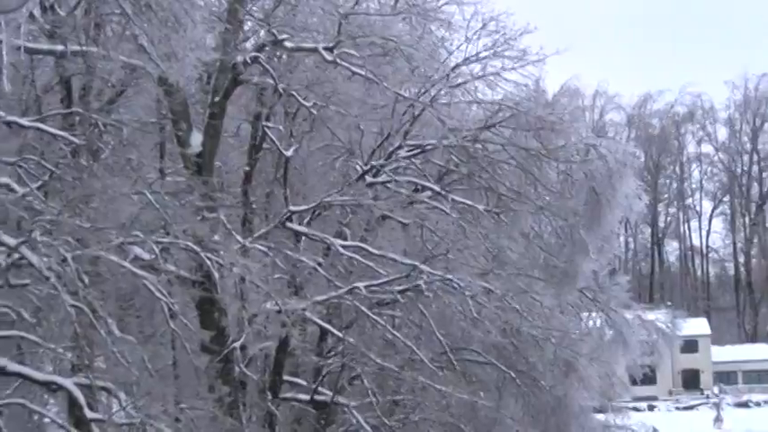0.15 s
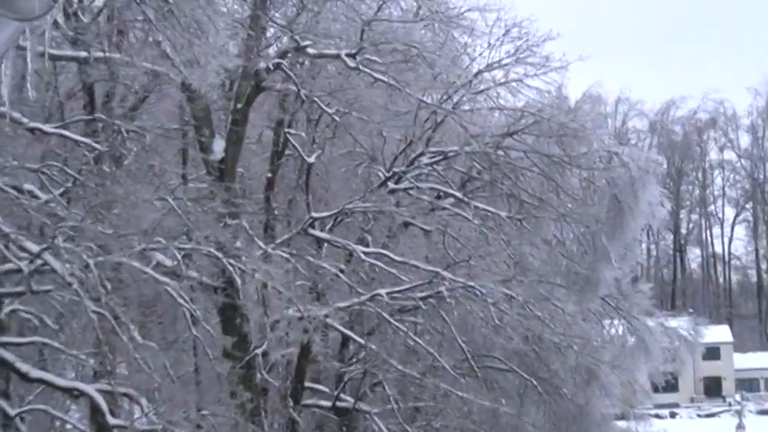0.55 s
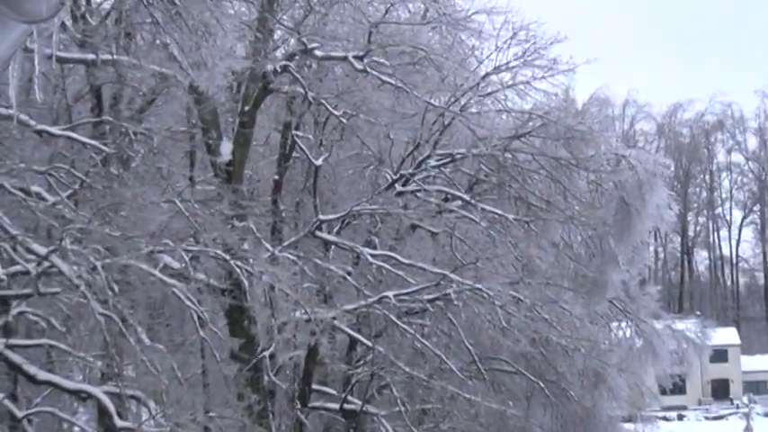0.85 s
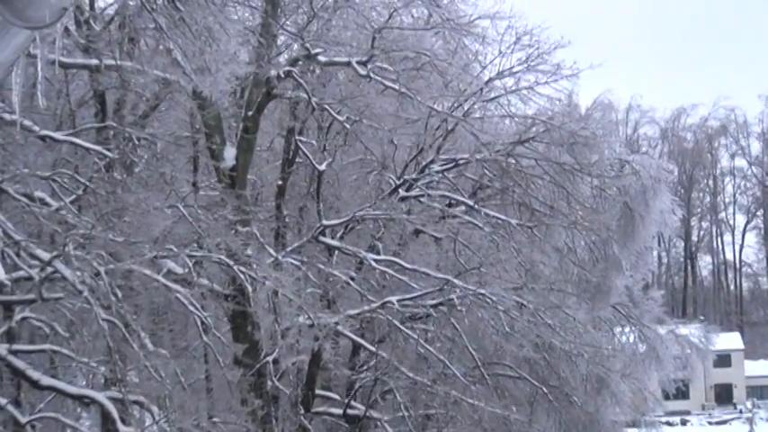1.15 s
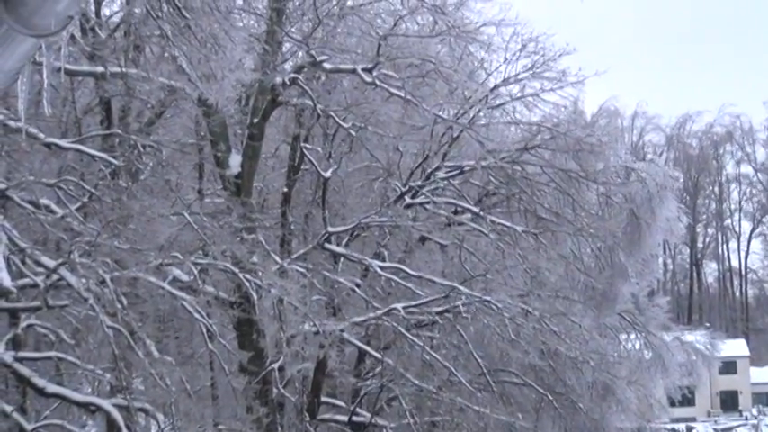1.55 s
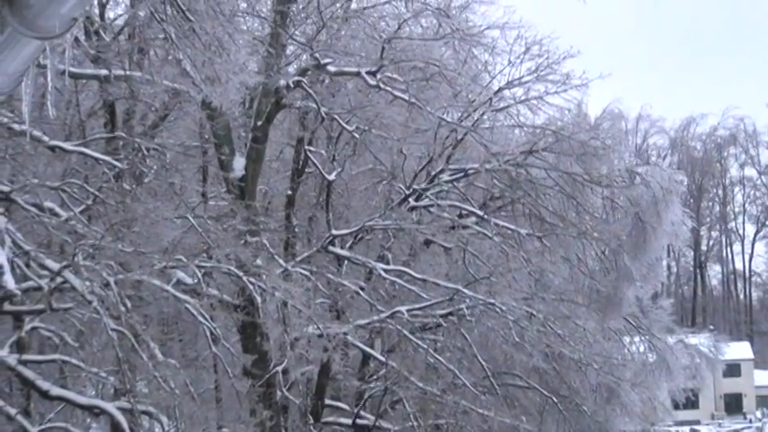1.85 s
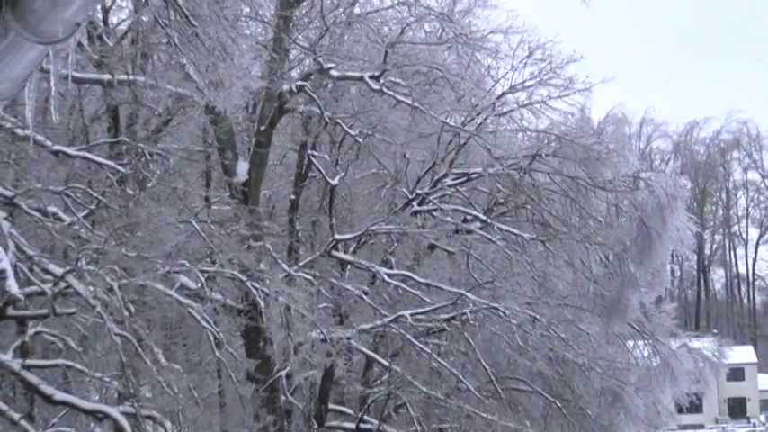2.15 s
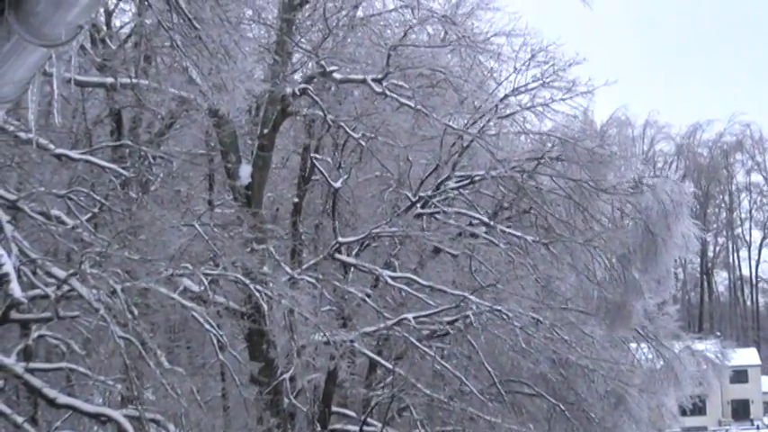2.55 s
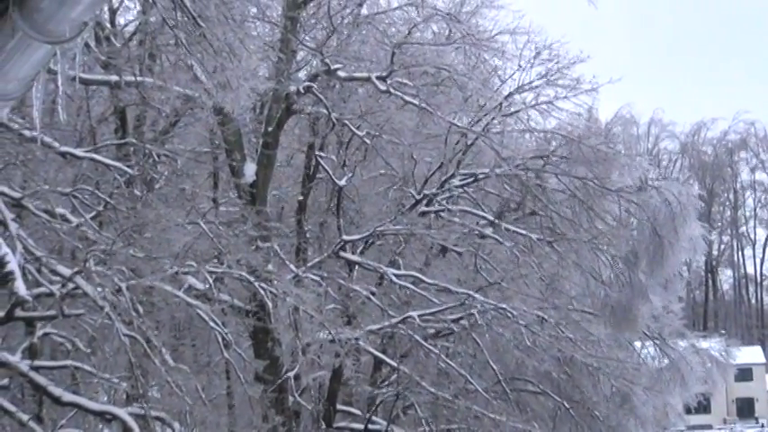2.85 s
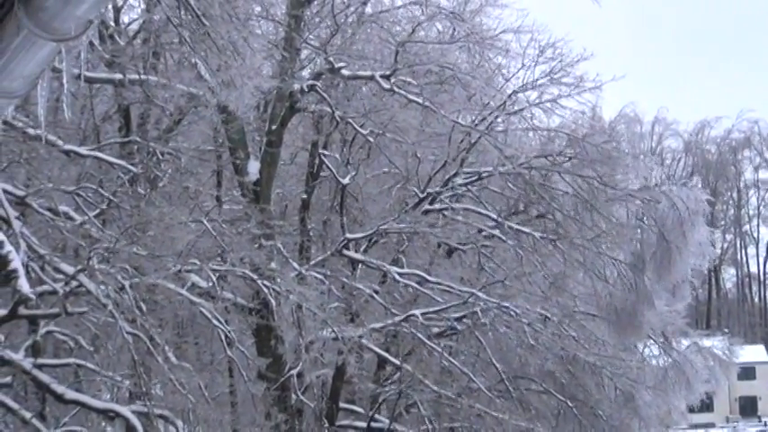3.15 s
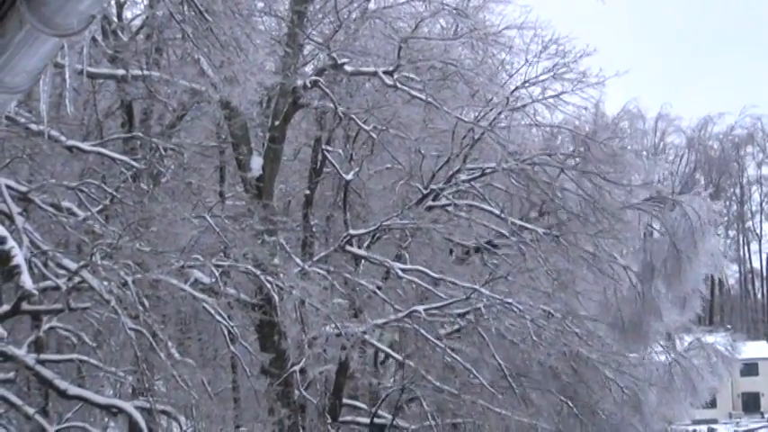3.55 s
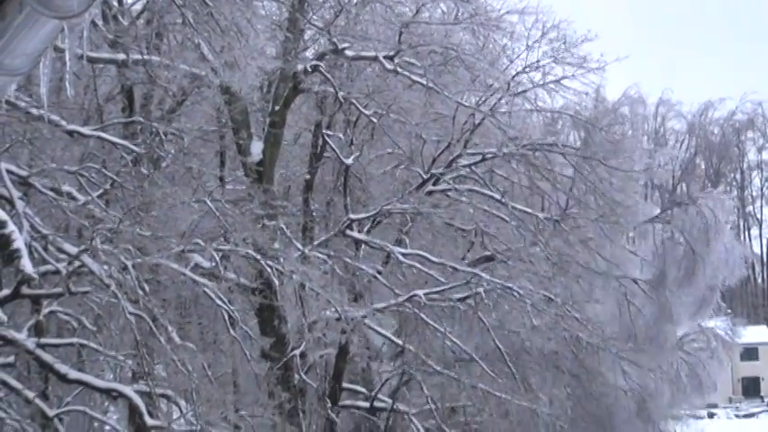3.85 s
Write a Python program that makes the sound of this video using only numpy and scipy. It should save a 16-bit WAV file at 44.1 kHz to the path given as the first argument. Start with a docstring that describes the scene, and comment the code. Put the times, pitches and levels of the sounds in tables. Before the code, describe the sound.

Wood cracks sparsely at a distance in a frozen forest, then faster, swelling into a loud crackling rush as a limb gives way. Close by, ice bits tick and sift down over steady, distant air noise.

```python
"""A limb of an ice-laden tree, some way off, splinters in ever denser cracks until it tears loose in a rush.
Each fracture excites a cluster of damped vibrations, and the woods answer with a long, dull reverberation.
Close by, bits of ice tick down and fine ice sifts over a bed of distant air noise.
A thin whistle falls in pitch once."""
import sys
import numpy as np
from scipy import signal
from scipy.fft import rfft, irfft, next_fast_len
from scipy.io import wavfile
from scipy.ndimage import map_coordinates

SR = 44100
rng = np.random.default_rng(int(sys.argv[2]) if len(sys.argv) > 2 else 0)


def put_to_file(sound):
    """Save the sound as 16-bit audio at rate SR, in the file named by the first command-line argument."""
    columns = np.atleast_2d(sound).T  # one column per channel
    safe = np.clip(columns, -1, 1)
    whole_steps = np.round(safe * 32767)
    wavfile.write(sys.argv[1], SR, whole_steps.astype(np.int16))


N = 176400

# Left-right coherence of the air and the sifting ice: f/Hz, coherence
DIFFUSE_COHERENCE = [(60, 1), (950, 0.91), (15000, 0.62)]
# Envelope of fine ice sifting down: t/s, level/dB
SIFTING_ENVELOPE = [(0, -48.5), (4, -40.5)]
# Envelope of countless small fibres and ice breaking: t/s, level/dB
TEARING_ENVELOPE = [(1.55, -44), (1.62, -35), (2.5, -46.5), (2.7, -28), (3.05, -27), (3.38, -30.5),
                    (3.47, -26), (3.62, -26), (3.69, -18), (3.78, -20.5), (4, -18)]


def amp(db):
    """Amplitude ratio of a level in decibels."""
    return 10 ** (np.asarray(db) / 20)


def along(points, hz):
    """Interpolation of (f/Hz, value) points on a logarithmic frequency axis."""
    f, value = np.transpose(points)
    return np.interp(np.log(hz + 1), np.log(f + 1), value)


def envelope(rows):
    """Gain per sample from (t/s, level/dB) rows, silent before the first."""
    t, db = np.transpose(rows)
    return amp(np.interp(np.arange(N) / SR, t, db, left=-120))


def wobble(rate):
    """Smooth random modulation with `rate` knots a second."""
    return map_coordinates(rng.standard_normal(int(N * rate / SR) + 4), [np.arange(N) * rate / SR])


def filtered(x, response):
    """Linear filtering: the spectrum is multiplied by a frequency response."""
    size = next_fast_len(N + SR // 2)
    return irfft(rfft(x, size) * response(np.fft.rfftfreq(size, 1 / SR)), size)[..., :N]


def stereo_noise(spectrum, coherence):
    """Partly coherent noise of rms 1: the sum and difference of two independent noises."""
    def response(hz):
        angle = np.arccos(np.clip(along(coherence, hz), -1, 1)) / 2
        return amp(along(spectrum, hz)) * [np.cos(angle), np.sin(angle)]
    mid, side = filtered(rng.standard_normal((2, N)), response)
    pair = np.array([mid + side, mid - side])
    return pair / np.sqrt(np.mean(pair ** 2) + 1e-20)


def scattered(rows, count, over_db, scatter_db, hz, pitch_oct):
    """Random events (t/s, level/dB, f/Hz) whose levels scatter above an envelope."""
    t, db = np.transpose(rows)
    when, strength, pitch = rng.random((count, 3)).T
    onset = t[0] + (t[-1] - t[0]) * when
    event_db = np.interp(onset, t, db) + over_db - scatter_db * np.log(1 - .98 * strength)
    return onset, event_db, hz * 2 ** (pitch_oct * (2 * pitch - 1))


def snaps(t, db, hz, count, cycles, spread_s, loss_db, pitch_oct, samples, below=.3, after_db=0):
    """Damped vibration: per event one ring on time and weaker ones after, each down 60 dB in `cycles`."""
    when, pitch, loss, polarity = rng.random((len(t), 4, count)).swapaxes(0, 1)
    follower = np.arange(count) > 0
    delay = spread_s * when ** 1.4 * follower
    f = np.clip(hz[:, None] * 2 ** (pitch_oct * 2 * (pitch - below) * follower), 240, 16000)
    ring_db = db[:, None] + (after_db - loss_db * (delay / spread_s + loss)) * follower
    gain = (amp(ring_db) * np.sign(polarity - .5)).reshape(-1, 1)
    periods = f.reshape(-1, 1) * np.arange(samples) / SR
    rings = gain * np.sin(2 * np.pi * periods) * amp(-60 * periods / cycles) * (1 - np.exp(-1.5 * periods))
    at = np.round((t[:, None] + delay) * SR).astype(int).reshape(-1, 1) + np.arange(samples)
    return np.bincount(at.ravel(), rings.ravel(), N + SR)[:N]


def distant_air():
    """Stationary broadband noise, less coherent between left and right as frequency rises."""
    # Spectral density of the air noise: f/Hz, level/dB
    spectrum = [(15, -56), (25, -12), (60, -18), (140, -2), (476, 2), (1870, -3), (4500, -9.5),
                (11000, -20), (16000, -39)]
    return amp(-42.5) * stereo_noise(spectrum, DIFFUSE_COHERENCE)


def sifting_ice():
    """Countless tiny impacts add incoherently to a flickering hiss."""
    # Spectral density of the hiss: f/Hz, level/dB
    spectrum = [(2500, -15), (5000, -7.5), (10500, 4.5), (16000, -8)]
    flicker = amp(-1 + 1.35 * wobble(24) + 2.9 * wobble(60))
    return flicker * envelope(SIFTING_ENVELOPE) * stereo_noise(spectrum, DIFFUSE_COHERENCE)


def falling_ice():
    """Impact excitation: bits of ice ring brightly and shatter into a spray, among many fainter ticks."""
    # Bits of ice landing nearby: t/s, level/dB, f/Hz
    landings = [(0.0368, -12, 9800), (0.091, -11.5, 8000), (0.107, -10, 8000), (0.25, -18.5, 11000),
                (0.367, -17, 7460), (0.4324, -6.5, 10300), (0.507, -8, 12100), (0.5209, -11, 6860),
                (0.576, -14, 10000), (0.5825, -4.5, 9400), (0.5923, -5, 11400), (0.6586, -13, 9700),
                (0.963, -13, 11400), (1.062, -14, 12700), (1.1307, -8.5, 12200), (1.208, -14, 8100),
                (1.257, -16, 7360), (1.488, -11.5, 8700), (1.9793, -7.5, 9400), (2.015, -5, 12200),
                (3.0385, -9, 9300), (3.4208, -12, 7300), (3.894, -25, 5300)]
    t, db, hz = np.transpose(landings)
    tick = snaps(t, db, hz, count=5, cycles=15, spread_s=.0015, loss_db=3, pitch_oct=.7,
                 samples=120, below=.55, after_db=-7)
    spray = snaps(t, db - 17, hz, count=50, cycles=12, spread_s=.028, loss_db=9, pitch_oct=.6,
                  samples=100, below=.5)
    grains = scattered(SIFTING_ENVELOPE, count=260, over_db=15.5, scatter_db=3, hz=7840, pitch_oct=.61)
    faint = snaps(*grains, count=5, cycles=15.5, spread_s=.0021, loss_db=2.5, pitch_oct=.7, samples=100)
    ice = tick + spray + faint
    width = amp(-18) * np.roll(ice, 40) * [[1], [-1]]  # delayed copy in antiphase
    return ice * amp([[.6], [-.6]]) + width


def cracks():
    """Brittle fracture: a brief creak leads into a burst of splinters topped by a thin click."""
    # Splintering wood: t/s, level/dB, f/Hz
    fractures = [(0.203, -23, 1366), (0.3353, -16, 2040), (0.753, -27, 1920), (1.0955, -25.5, 2000),
                 (1.3782, -12, 1820), (1.432, -20.5, 2220), (1.538, -22.5, 2050), (1.588, -3.5, 1530),
                 (1.6673, -15, 1650), (1.9418, -15.5, 1670), (1.9833, -8.5, 2110), (2.1285, -15, 2050),
                 (2.1612, -10, 1970), (2.283, -15, 2550), (2.507, -20, 1840), (2.593, -9.5, 1770),
                 (2.636, -12, 1800), (2.6899, -1, 1770), (2.7158, -7, 1380), (2.784, -9, 1550),
                 (2.8593, -4, 1610), (2.9325, -7, 2320), (2.9733, -7.5, 3220), (2.9865, -9, 2120),
                 (2.9982, -1, 1334), (3.1678, -3.5, 1700), (3.249, -8, 1230), (3.292, -12.5, 1870),
                 (3.444, -10.5, 2270), (3.459, -4.5, 1750), (3.4754, -6.5, 1600), (3.5375, -4.5, 1350),
                 (3.5722, -6.5, 1840), (3.6345, -5, 2270), (3.6672, -4, 1620), (3.756, -4.5, 1500),
                 (3.784, -5.5, 2200), (3.8395, -12, 1580), (3.857, -3, 1660)]
    t, db, hz = np.transpose(fractures)
    burst = snaps(t, db, hz, count=18, cycles=15, spread_s=.008, loss_db=9, pitch_oct=.9,
                  samples=500, after_db=-6)
    click = snaps(t, db + .3, 2.27 * hz, count=5, cycles=5.3, spread_s=.0028, loss_db=.5, pitch_oct=.96,
                  samples=150)
    creak = snaps(t - .005, db - 15, hz, count=8, cycles=10, spread_s=.005, loss_db=1, pitch_oct=1,
                  samples=400)
    return creak + burst + click


def early_reflection(x, delay_s=.0066, corner_hz=2800):
    """Specular reflection: a hard surface on the left throws the treble back."""
    bright = lambda hz: (1j * hz / (corner_hz + 1j * hz)) ** 2 * np.exp(-2j * np.pi * hz * delay_s)
    return amp(-4.5) * filtered(x, bright) * amp([[2.5], [-4]])


def woods_echo(x, patterns=8, coherence=.84, far_db=-4, near_db=-5.5, near_t60_s=.11):
    """Reverberation by scattering: brief from near twigs, long from far trees and longest in the bass."""
    # Reverberation time of the far trees: f/Hz, T60/s
    decay_times = [(300, 1.78), (1500, 0.35), (10000, 1.1)]
    angle = np.arccos(coherence) / 2
    pattern = np.arange(N) // 2048 % patterns  # successive stretches of sound find other trees
    echo = np.zeros((2, N))
    for k in range(patterns):
        hz, t, spectra = signal.stft(rng.standard_normal((2, SR * 3 // 2)), SR, nperseg=256)
        decay = amp(-60 * t / along(decay_times, hz)[:, None])
        mid, side = signal.istft(spectra * decay, SR, nperseg=256)[1]
        far = np.cos(angle) * mid + np.sin(angle) * side * [[1], [-1]]
        near = rng.standard_normal(len(mid)) * amp(-60 * np.arange(len(mid)) / SR / near_t60_s)
        tail = amp(far_db) * far / np.linalg.norm(mid) + amp(near_db) * near / np.linalg.norm(near)
        echo += signal.fftconvolve((x * (pattern == k))[None], tail, axes=1)[:, :N]
    return echo


def path_from_tree(x, low_cut_hz=117):
    """Transmission to the listener: little bass arrives, lows lean right and highs lean left."""
    # Left channel over right: f/Hz, level/dB
    balance = [(60, -11), (380, -1), (2380, 2.5), (15000, 3.5)]
    high_pass = lambda hz: (1j * hz / (low_cut_hz + 1j * hz)) ** 3
    return filtered(x, lambda hz: amp(along(balance, hz) * [[.5], [-.5]]) * high_pass(hz))


def whistle(start_s=.84, length_s=.42, start_hz=3700, fall_hz_per_s=1000):
    """A far call: a falling linear chirp and a weaker tone below, roughened by amplitude modulation."""
    t = np.arange(N) / SR - start_s
    swell = np.sin(np.pi * np.clip(t / length_s, 0, 1)) ** .5 * (1.5 + wobble(230))
    phase = 2 * np.pi * (start_hz - fall_hz_per_s * t / 2) * t
    return amp(-55.5) * swell * (np.sin(phase) + .6 * np.sin(.76 * phase))


def snapping_fibres():
    """Acoustic emission: small fibres fail at random times, louder as the limb gives way."""
    failures = scattered(TEARING_ENVELOPE, count=1400, over_db=1, scatter_db=3.5, hz=1500, pitch_oct=1.782)
    return snaps(*failures, count=3, cycles=11.14, spread_s=.005, loss_db=4.5, pitch_oct=.78, samples=400)


def tearing():
    """Superposition: breaks too dense to hear singly merge into a fluttering rush."""
    # Spectral density of the rush: f/Hz, level/dB
    spectrum = [(59, -68), (100, -20.5), (308, -1), (343, -6), (1760, -4), (10500, -28), (16000, -46)]
    # Its left-right coherence: f/Hz, coherence
    coherence = [(60, 0.98), (950, 0.85), (15000, 0.7)]
    flutter = amp(-1.5 + 2.6 * wobble(70))
    return flutter * envelope(TEARING_ENVELOPE) * stereo_noise(spectrum, coherence)


def knocks():
    """Impulsive excitation: heavy breaks shake the limb, whose low resonances thud."""
    # Heavy breaks: t/s, level/dB, f/Hz
    breaks = [(1.585, -4, 506), (2.684, -10.5, 550), (2.986, -5.5, 443), (2.999, -12, 486),
              (3.683, -4, 495), (3.793, -6.5, 502), (3.88, -11, 318), (3.903, -10, 298)]
    return snaps(*np.transpose(breaks), count=16, cycles=18, spread_s=.03, loss_db=4, pitch_oct=.65,
                 samples=2500, below=.6, after_db=-10)


def scene():
    """Sound pressures add: the limb with its echoes, the ice, the air and the whistle."""
    limb = cracks() + knocks() + snapping_fibres()
    tree = path_from_tree(limb + tearing() + early_reflection(limb) + woods_echo(limb))
    return tree + sifting_ice() + distant_air() + falling_ice() + whistle()


def record(dry, ceiling=.85, band_limit_hz=16683):
    """Soft saturation rounds loud peaks; a low-pass response removes the top treble."""
    # Treble roll-off: f/Hz, level/dB
    roll_off = [(15700, 0), (16000, -16)]
    held = dry / (1 + np.abs(dry / ceiling) ** 4) ** .25
    return filtered(held, lambda hz: amp(along(roll_off, hz)) * (hz < band_limit_hz))


dry = scene()
out = record(dry)
put_to_file(out)
```